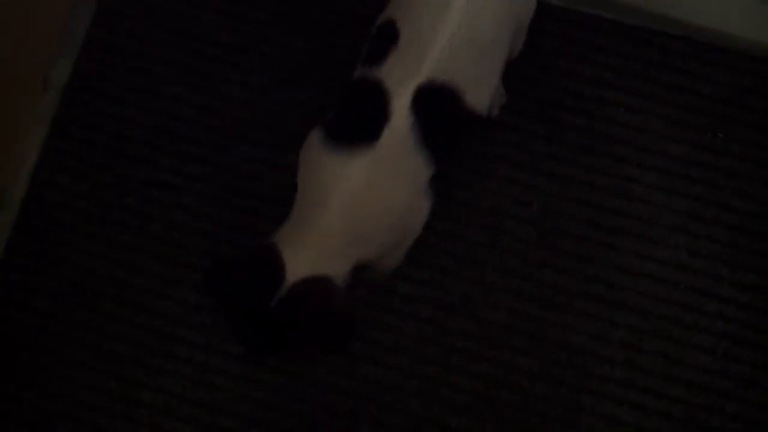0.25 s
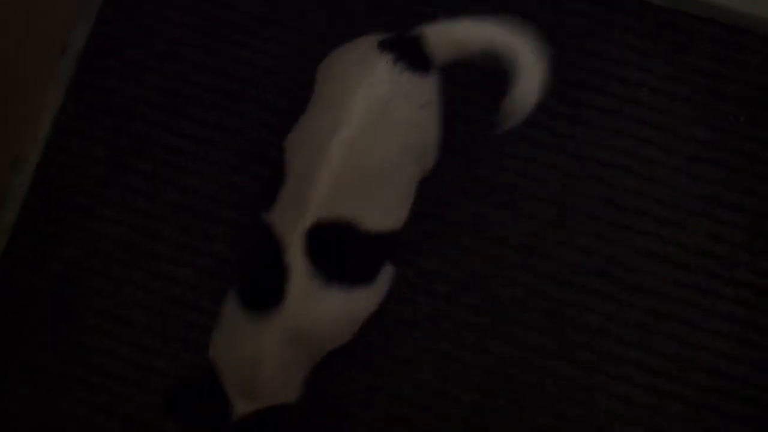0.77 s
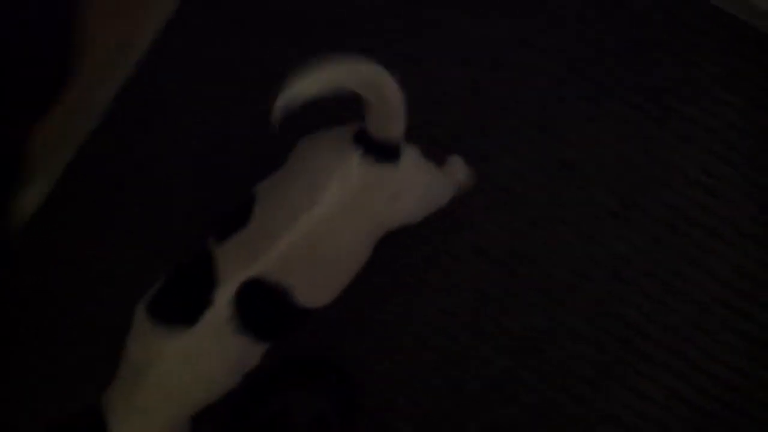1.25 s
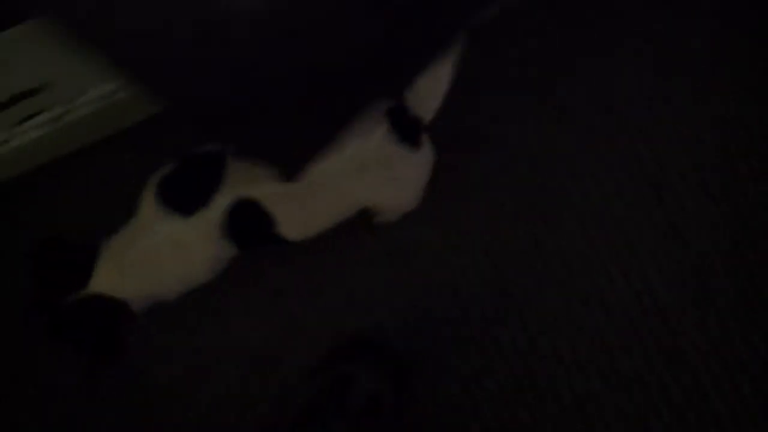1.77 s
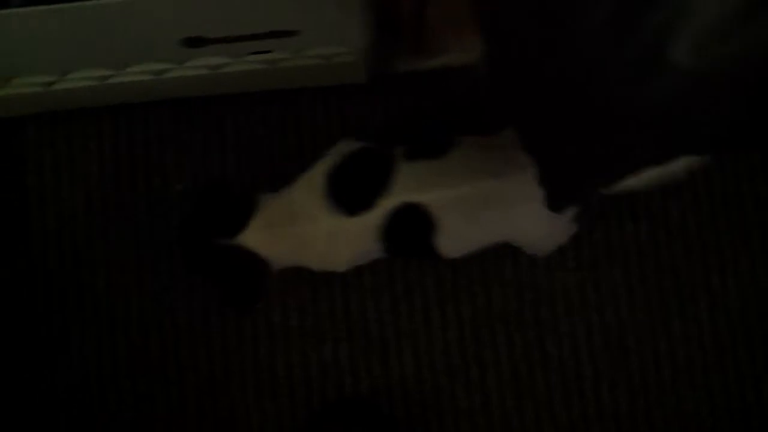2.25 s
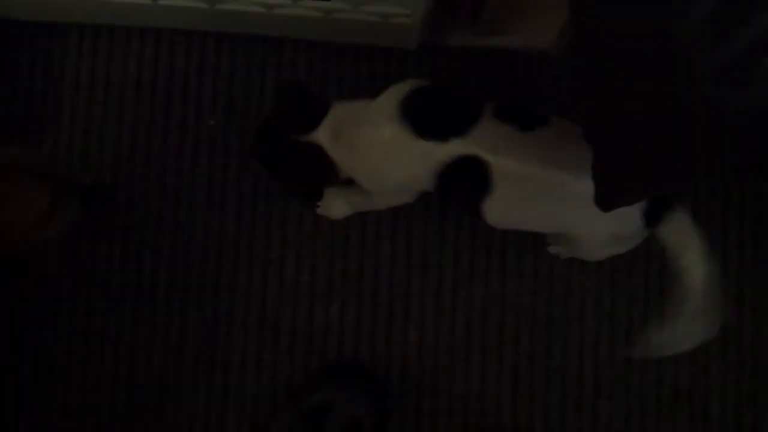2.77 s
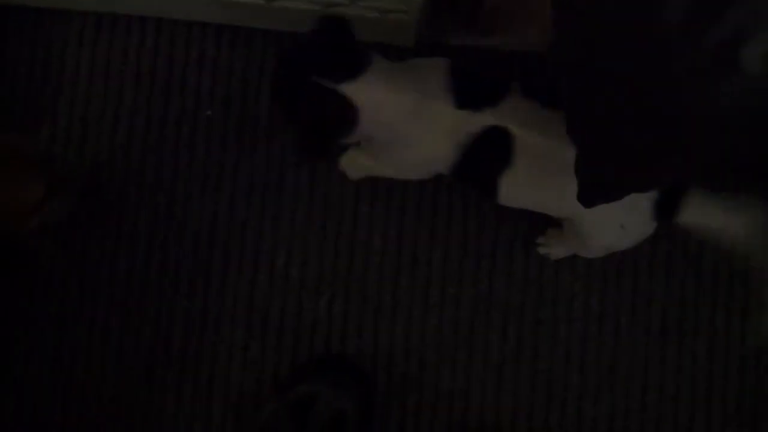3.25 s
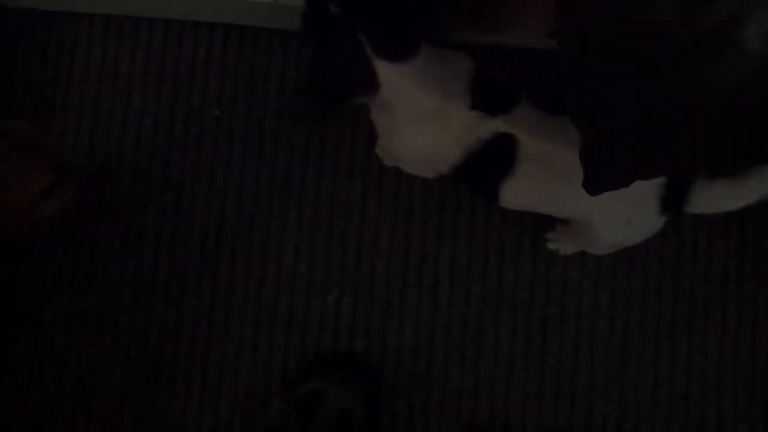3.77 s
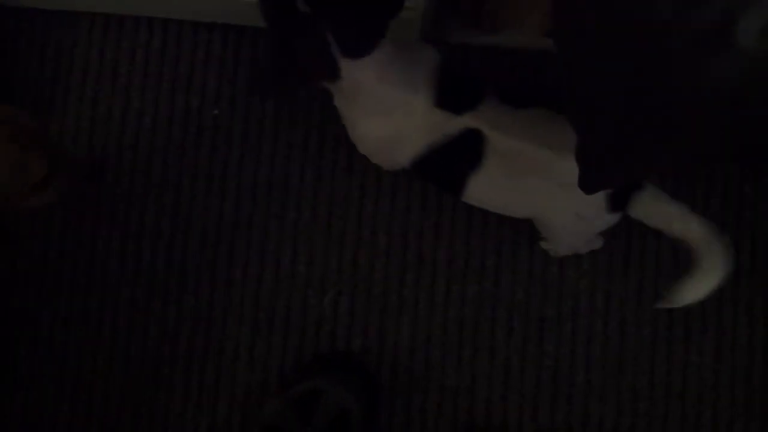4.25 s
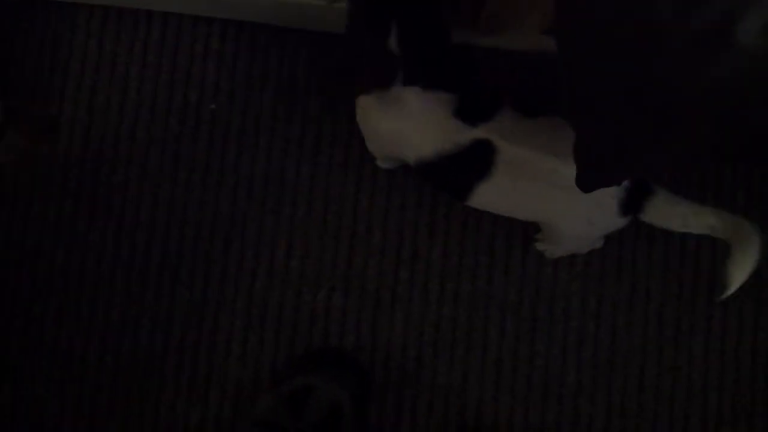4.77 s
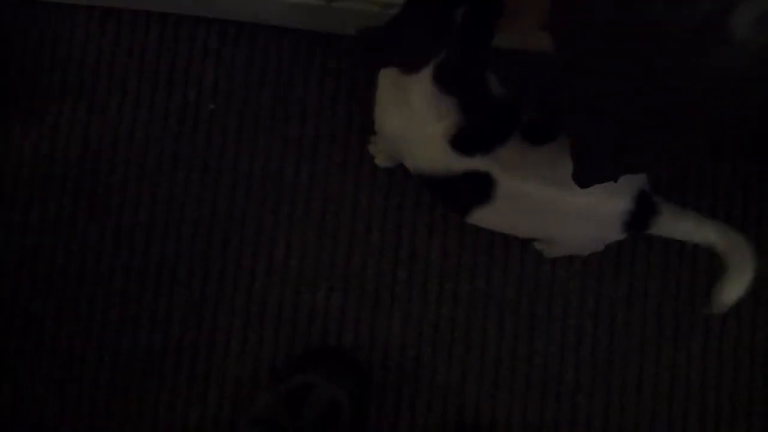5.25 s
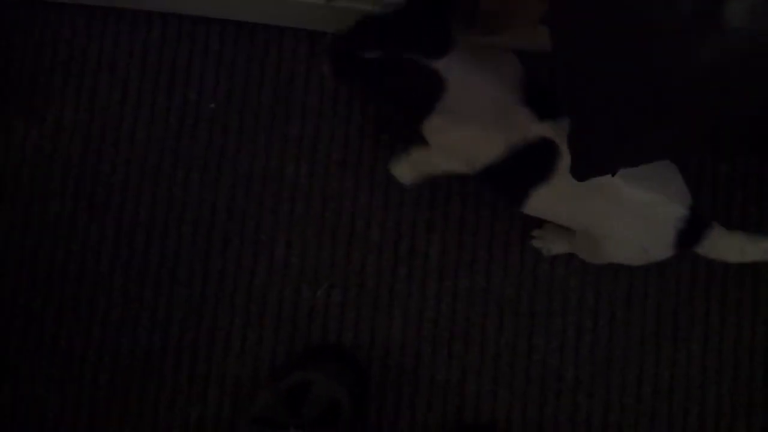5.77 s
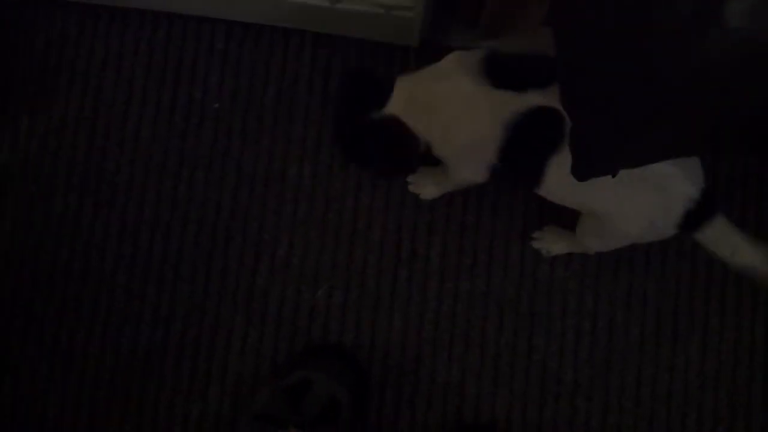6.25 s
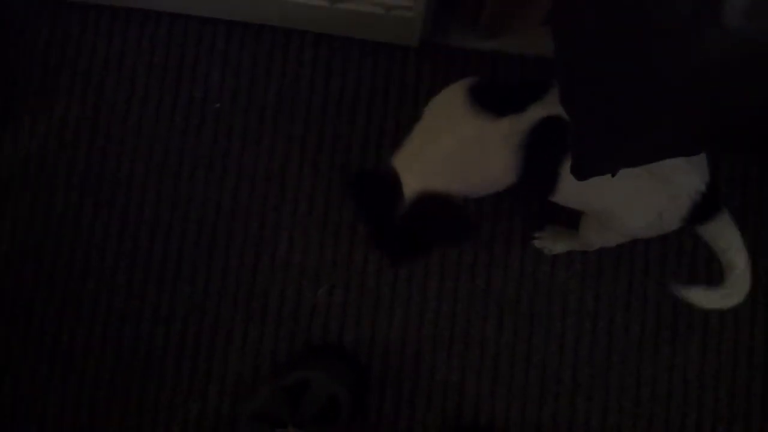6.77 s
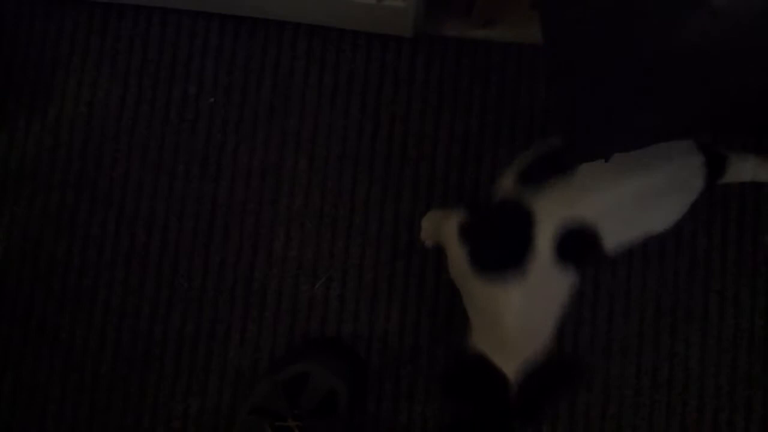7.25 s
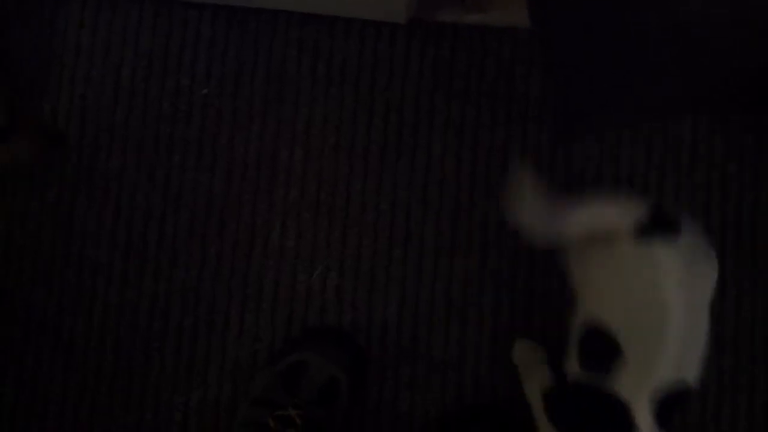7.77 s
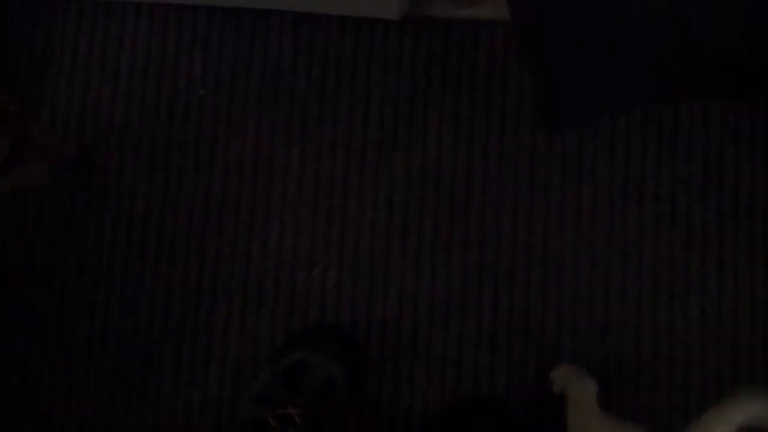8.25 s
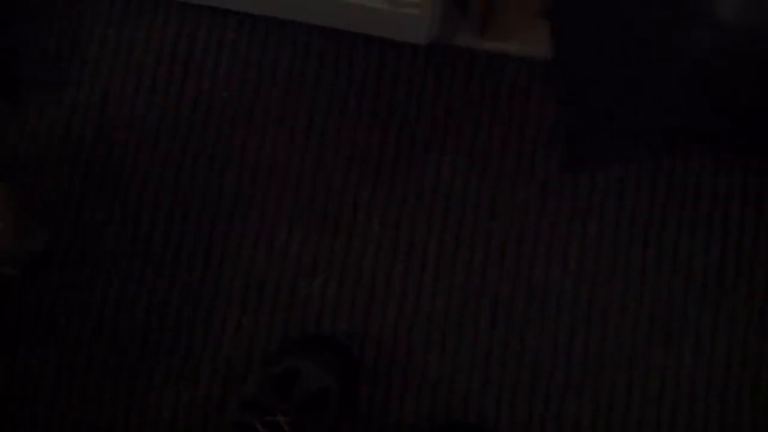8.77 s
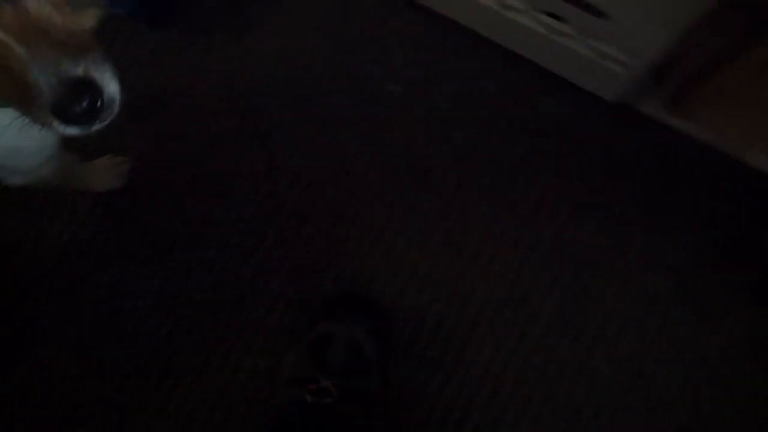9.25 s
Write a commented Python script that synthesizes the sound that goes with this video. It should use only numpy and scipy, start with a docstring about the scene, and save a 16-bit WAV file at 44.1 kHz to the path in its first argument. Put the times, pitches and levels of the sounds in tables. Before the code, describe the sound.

Close up in a dry carpeted room, a small dog crunches kibble over steady hiss. Light fur rustle and faint ticks lead to tight clusters of sharp cracks and bowl clinks around two to three seconds. A sparser, quieter stretch follows with a faint nose whistle, then crunching returns, peaking near seven and a half and eight seconds before fading into rustling.

```python
"""A steady hiss and a light stir of fur open the scene, then a small dog crunches dry kibble close by.
Cracks are bursts of micro-cracks in clusters, filtered into bowl knocks, pitched snaps and bright splinters.
Between them fur and cloth rustle as fluttering coloured noise, and paws thud as short low booms.
The nose whistles faintly once as narrow bands of noise; twice a damped swing marks a touch on the left port.
A short tail of decaying noise places the crunching in a carpeted room."""
import sys
import numpy as np
from scipy import signal
from scipy.fft import rfft, irfft
from scipy.io import wavfile
from scipy.ndimage import uniform_filter1d, minimum_filter1d

SR = 44100
rng = np.random.default_rng(int(sys.argv[2]) if len(sys.argv) > 2 else 0)


def wrap_up_sound(samples):
    """Save the sound to the file named by the first command line argument, as 16-bit audio."""
    columns = np.atleast_2d(samples).T
    # keep every value between -1 and 1, then stretch to whole-number steps
    tamed = np.clip(columns, -1, 1)
    steps = np.round(tamed * 32767).astype(np.int16)
    wavfile.write(sys.argv[1], SR, steps)


N = 419389

# steady hiss colour: (frequency [Hz], relative level per Hz [dB])
HISS_COLOUR = [(30, -13.5), (80, -17), (150, -8), (300, -2), (600, 1), (900, -1), (1400, -2.5),
               (2200, -5.5), (3800, -7), (5000, -3), (6800, -16), (8500, -8.5), (10500, -5), (14000, -11)]
# the two microphone ports: (frequency [Hz], likeness [-1..1], left over right [dB])
PORT_PAIR = [(60, -0.19, 4), (130, -0.15, 7.5), (285, -0.46, 6), (664, -0.43, 2), (1420, -0.041, 0.5),
             (2600, -0.093, 0.5), (4950, -0.062, -8), (8800, 0.15, 3), (13800, -0.29, 2.5)]
# room tail: (frequency [Hz], time to fall 60 dB [s])
ROOM_DECAY = [(100, 0.27), (530, 0.097), (1400, 0.11), (3700, 0.11), (10000, 0.065)]
# paws thud on the floor: (time [s], level before onset smoothing [dB])
PAW_THUDS = [(1.3, -40), (1.97, -34), (2.07, -58), (2.47, -45), (2.63, -49), (3.41, -63), (8.19, -45),
             (9.43, -48)]
# soft touches on the left port: (time [s], peak level [dB])
PORT_TOUCHES = [(8.2595, -7), (9.479, -24)]
# thin whistle of the nose: (time [s], lower resonance [Hz], upper resonance [Hz], level before trim [dB])
NOSE_WHISTLE = [(5.19, 1550, 3120, -70), (5.22, 1487, 3080, -52), (5.31, 1400, 2860, -45),
                (5.38, 1346, 2910, -45), (5.45, 1230, 2950, -59)]
# colour of the rubbing fur: (frequency [Hz], relative level per Hz [dB])
FUR_COLOUR = [(30, -30), (85, -17.5), (130, -20.5), (250, -3.5), (600, 4), (1400, 3), (2500, 1),
              (5200, -3.5), (7000, -39), (8500, -18.5), (11000, -18.5), (14000, -33)]
# light rubbing as the dog moves about or stands: (time [s], body before trim [dB], treble [dB])
FUR_STIR = [(0, -51.5, -52), (.95, -61.5, -60), (1.2, -44.5, -41.5), (2.2, -47, -41.5), (3.05, -46, -44),
            (3.25, -51.5, -48), (3.6, -46.5, -43.5), (3.85, -49.5, -53), (4.25, -57, -59), (5.4, -55, -53),
            (6.05, -61, -59), (6.6, -48, -72), (7.25, -59.5, -60), (7.5, -44.5, -43.5), (8, -50.5, -47.5),
            (8.4, -48.5, -43), (8.62, -56.5, -53.5), (9.5, -50, -35)]
# the dog brushes against bowl and carpet:
# (time at the height of the stroke [s], length [s], body before trim [dB], treble [dB])
BRUSH_STROKES = [(0.637, 0.2, -46, -48), (0.894, 0.16, -41.5, -56), (1.128, 0.17, -38.5, -42),
                 (1.301, 0.24, -29, -29.5), (1.51, 0.11, -58, -37), (1.646, 0.18, -43.5, -56),
                 (1.966, 0.32, -38.5, -35), (2.084, 0.13, -31.5, -27.5), (2.34, 0.113, -32, -35),
                 (2.542, 0.34, -41, -35.5), (2.706, 0.19, -35.5, -33), (2.939, 0.26, -41.5, -41),
                 (3.354, .09, -33, -29.5), (3.436, 0.098, -26.5, -31.5), (3.888, 0.079, -45.5, -60),
                 (4.121, .14, -46, -42), (4.51, 0.3, -49.5, -44.5), (5.257, 0.67, -56, -41.5),
                 (6.262, .14, -38.5, -44), (6.48, 0.13, -35.5, -42), (7.077, 0.17, -41.5, -41.5),
                 (7.154, 0.063, -28, -39), (7.371, 0.21, -35.5, -35), (7.693, 0.084, -34.5, -49),
                 (8.152, .2, -33, -29.5), (8.454, 0.13, -35.5, -37), (8.796, 0.17, -42.5, -38),
                 (9.17, 0.43, -45, -33), (9.408, 0.23, -38, -34.5)]
# ringing of the bowl, wall and rim first: (frequency [Hz], width [Hz], level over the plain knock [dB])
BOWL_MODES = [(848, 33, -34), (1864, 37, -26), (460, 54, 3), (2854, 160, -2), (4370, 82, -2),
              (4565, 180, 7.5), (5080, 95, 4), (5770, 30, -16)]
# contacts that set the two main modes ringing: (time [s], wall mode level [dB], rim mode level [dB])
BOWL_TAPS = [(1.952, -40, -16), (2.006, -32, -7.5), (2.072, -28, -14), (2.642, -8, -42), (2.672, -20, -15),
             (2.716, -16, -43), (2.737, -32, -40), (2.75, -14, -38), (2.877, -39, -17), (7.418, -38, -18),
             (7.448, -20, -13), (8.136, -22, -30), (8.148, -7, -28), (8.165, -4.5, -23), (8.188, -5, -21),
             (8.198, -25, -12)]
# individually placed cracks, ticks and mouth taps, faint to hard, before the trims in crunches():
# (time [s], crumbling time [s], knock level [dB], snap level [dB], pitch of the piece [Hz],
# treble splinter level [dB])
PLACED_CRACKS = [(.25, .003, -43, -50, 1200, -60), (.34, .003, -43, -50, 1200, -60),
                 (.48, .002, -56.5, -40.5, 4000, -55), (0.63, 0.0018, -62, -37, 2350, -42),
                 (.6664, 0.00093, -62, -36, 4300, -50), (0.8168, 0.0015, -34, -27.5, 2570, -24.5),
                 (0.8723, 0.008, -26.5, -28, 1720, -54), (0.8966, 0.0015, -49, -30, 1360, -53),
                 (0.933, .005, -44, -34, 4400, -59), (1.1191, 0.0037, -23, -27.5, 1430, -49),
                 (1.137, 0.0018, -42, -32.5, 1600, -53), (1.4892, 0.0036, -28, -35, 1760, -39),
                 (1.6045, 0.0022, -25, -29.5, 1430, -52), (1.6316, 0.0038, -38, -33, 1900, -47),
                 (1.6808, .004, -35, -34, 2210, -54), (1.8334, .004, -49, -35, 2017, -46.5),
                 (1.946, 0.0019, -47, -25, 4500, -33), (1.9496, 0.0034, -22.5, -16.5, 3100, -29.5),
                 (2.0003, 0.0033, -19, -16, 1750, -19.5), (2.0075, .002, -21, -23, 1650, -36),
                 (2.0663, .003, -44, -27, 2600, -36), (2.0733, 0.00096, -17.5, -14.5, 1550, -20.5),
                 (2.0884, 0.0073, -36, -17, 5500, -21), (2.3148, 0.0083, -46, -33, 3500, -31),
                 (2.325, 0.0025, -20, -19.5, 4600, -31), (2.339, .002, -45, -27, 2090, -37.5),
                 (2.5489, .002, -21, -24, 2774, -43), (2.6412, 0.0017, -19.5, -15, 3000, -20),
                 (2.6709, 0.0064, -30, -22.5, 2850, -22.5), (2.6784, 0.0059, -40, -21.5, 3550, -32),
                 (2.716, .003, -44, -27, 2650, -34), (2.7362, 0.0035, -26, -27.5, 2530, -35),
                 (2.774, 0.0036, -24.5, -19.5, 2440, -27.5), (2.8756, 0.0031, -45, -16.5, 2160, -27.5),
                 (3.0084, 0.012, -34.5, -39, 1288, -38.5), (3.1656, 0.0066, -44, -33, 3700, -47),
                 (3.3434, .002, -29, -31.5, 3920, -39), (3.4328, 0.0042, -23.5, -28, 1800, -31.5),
                 (3.4959, 0.0043, -32, -28, 2850, -37), (3.7825, 0.0056, -41, -35, 2720, -42.5),
                 (4.057, .001, -46, -40, 3120, -39), (4.4844, 0.0018, -42.5, -43, 3700, -37.5),
                 (4.5488, .005, -50.5, -42, 4300, -52), (5.04, 0.0031, -62, -41, 4100, -32),
                 (5.1028, 0.0075, -62, -31, 3020, -17.5), (5.3253, 0.0012, -52, -34, 2300, -51),
                 (6.177, 0.0025, -30, -39, 1400, -49), (6.254, .0014, -55, -31.5, 1755, -52),
                 (6.2747, 0.0059, -37, -33.5, 1730, -45), (6.4776, .003, -52, -31, 1480, -33.5),
                 (6.5207, 0.0047, -27.5, -29.5, 1750, -46), (6.5317, .002, -33, -39, 1400, -49),
                 (6.806, .003, -42, -37, 2150, -49), (6.8805, 0.0053, -25, -29.5, 1650, -58),
                 (7.0431, 0.0065, -25, -28, 1900, -34), (7.0835, 0.002, -52, -29.5, 1615, -50),
                 (7.0992, .002, -37, -24, 1990, -56), (7.1583, 0.0033, -26, -28, 2000, -31.5),
                 (7.329, 0.0026, -56, -23.5, 3990, -40), (7.3575, 0.0014, -43, -16, 2240, -37),
                 (7.367, 0.0012, -39, -19, 2140, -49), (7.3863, 0.0028, -22, -29.5, 1440, -25.5),
                 (7.418, .001, -21.5, -20, 1570, -36), (7.446, .0012, -11, -6, 2060, -11),
                 (7.631, .002, -63.5, -29.5, 4460, -30.5), (7.6513, 0.0063, -56, -27, 3210, -48),
                 (7.714, 0.0037, -25, -26, 2370, -41.5), (7.848, 0.0019, -20, -16, 2450, -24.5),
                 (8.0428, 0.0018, -57, -45, 2950, -31), (8.1334, 0.0016, -28, -19, 2950, -28),
                 (8.1458, 0.0011, -36, -14.5, 3000, -23), (8.1644, 0.0014, -27.5, -22, 3860, -31),
                 (8.1856, 0.0024, -15, -8, 3250, -13.5), (8.333, 0.00086, -60, -30.5, 2680, -52),
                 (8.4015, 0.0077, -41, -27, 3060, -29), (8.4189, .003, -33.5, -26.5, 2300, -45),
                 (8.443, .005, -39, -27.5, 2550, -37), (8.637, 0.0018, -55, -36, 4100, -47)]

HISS_DB = -43.5
CUTOFF_HZ = 14800
LIMIT_RELEASE_DB_PER_S = 600
# part of a stroke's length spent swelling; drop at both ends; 1 pointed, 2 rounded
STROKE_RISE_SHARE, STROKE_ENDS_DB, STROKE_SHAPE = 0.42, 18.5, 1.3
# crumbs: rate and level at the usual rubbing level, full range of random level
CRUMBS_PER_S, CRUMB_DB, CRUMB_SPREAD_DB, USUAL_RUB_DB = 20, -46, 12, -48
# shares of the rubbing's swing in dB that crumb level and rate follow; highest rate
CRUMB_FOLLOWS, CRUMB_RATE_FOLLOWS, MOST_CRUMBS_PER_S = 0.55, 0.8, 50
CRUMB_KNOCK_DB, CRUMB_SPLINTER_DB = -8, -8   # relative to the snap
PIECE_WIDTH_SHARE = 0.2   # width of a piece's ring over its pitch
CRUSH_SHARE, CRUSH_FOLLOWS = 1.21, 0.41   # broad crushing noise at 0 dB; how far it shrinks in small snaps
SPLINTER_PAN_DB = 24   # splinters reach the left port best


def from_db(db):
    """Decibels to gain."""
    return 10 ** (np.asarray(db) / 20)


def rms_one(x):
    """Scale to unit power."""
    return x / np.sqrt(np.mean(x ** 2) + 1e-20)


def in_time(rows):
    """Each column of a curve at every sample."""
    s, *columns = np.transpose(rows)
    return [np.interp(np.arange(N) / SR, s, column) for column in columns]


def at_hz(rows, hz):
    """Each column of a spectrum at one frequency, along a log axis."""
    table_hz, *columns = np.transpose(rows)
    return [np.interp(np.log(hz), np.log(table_hz), column) for column in columns]


def band(x, low_hz, high_hz, order=2):
    """Causal band-pass."""
    sos = signal.butter(order, [low_hz, high_hz], "band", fs=SR, output="sos")
    return signal.sosfilt(sos, x + 1e-18)


def resonate(x, hz, width_hz):
    """One two-pole resonance with gain 1 on top."""
    r = np.exp(-np.pi * width_hz / SR)
    feed = np.array([1, 0, -1]) * (1 - r * r) / 2
    return signal.lfilter(feed, [1, -2 * r * np.cos(2 * np.pi * hz / SR), r * r], x + 1e-18)


def drift(per_s):
    """Chance movement with unit rms: random knots joined by straight lines."""
    knots = np.arange(N) / SR * per_s
    return rms_one(np.interp(knots, np.arange(4000), rng.standard_normal(4000)))


def pan(db):
    """Left and right gains at constant power."""
    return rms_one(from_db([[db / 2], [-db / 2]]))


def port_bands(size):
    """Bands of stereo noise as the two ports hear it: (centre Hz, noise)."""
    edges = np.geomspace(25, 16500, 25)
    white = rng.standard_normal((2, 2, size))   # neighbouring bands use different noise
    for k, (low, high) in enumerate(zip(edges, edges[1:])):
        mid, side = band(white[k % 2], low, high)
        hz = np.sqrt(low * high)
        alike, pan_db = at_hz(PORT_PAIR, hz)
        shared = np.sqrt(1 + alike) * mid
        opposed = np.sqrt(1 - alike) * side * [[1], [-1]]
        yield hz, (shared + opposed) * pan(pan_db)


def coloured(spectrum):
    """Stereo noise of a given colour, rms 1."""
    return rms_one(sum(from_db(at_hz(spectrum, hz)[0]) * noise for hz, noise in port_bands(N)))


def far_port(x, lag_s, gain):
    """Left hears the sound first, right a moment later."""
    right = np.interp(np.arange(N) - lag_s * SR, np.arange(N), x, left=0)
    return np.array([x, gain * right])


def hiss():
    """Steady coloured noise under everything."""
    return from_db(HISS_DB) * coloured(HISS_COLOUR)


def room(x, wet_db, build_s, count=6):
    """Dense reflections; the treble dies first, and the pattern shifts steadily, cycling through six tails."""
    t, out = np.arange(SR // 3) / SR, 0
    place = np.arange(N) / SR * 16 % count   # moves on by 16 tails a second
    for k in range(count):
        tail = sum(noise * from_db(-60 * t / at_hz(ROOM_DECAY, hz)[0]) for hz, noise in port_bands(len(t)))
        tail = tail * (1 - np.exp(-t / build_s))
        tail = tail / np.sqrt(np.sum(tail ** 2) / 2)
        distance = np.abs((place - k + count / 2) % count - count / 2)
        share = np.sin(np.pi / 2 * np.maximum(1 - distance, 0))   # constant-power crossfade
        out = out + from_db(wet_db) * signal.oaconvolve(x * share, tail, axes=1)[:, :N]
    return out


def paws(floor_hz, t60):
    """Soft steps make the floor boom briefly, in opposite phase at the ports."""
    s, level_db = np.transpose(PAW_THUDS)[:, :, None]
    since = np.maximum(np.arange(N) / SR - s, 0)
    decay = from_db(level_db - np.minimum(60 * since / t60, 200))
    booms = decay * np.sin(2 * np.pi * floor_hz * since) * (1 - np.exp(-since / 0.0061))
    return np.sum(booms, axis=0) * [[1], [-.3]]


def bump(hz, width_hz):
    """A soft touch on the left port: one heavily damped swing."""
    push = np.zeros(N)
    for s, db in PORT_TOUCHES:
        push[round(s * SR)] = from_db(db)
    swing = band(resonate(push, hz, width_hz), 146, 1390)
    return push.max() * swing / np.abs(swing).max() * [[1], [-.25]]


def nose_air(hz, width_hz):
    """Breath noise shifted up to a moving resonance."""
    breath = band(rng.standard_normal((2, N)), 12, width_hz)
    return rms_one(breath * np.sin(2 * np.pi * np.cumsum(hz) / SR))


def nose(width_hz):
    """Two narrow resonances of air that sink overall, the upper one turning up near the end."""
    lower_hz, upper_hz, level_db = in_time(NOSE_WHISTLE)
    t = np.arange(N) / SR
    sounding = (t > NOSE_WHISTLE[0][0]) & (t < NOSE_WHISTLE[-1][0])
    air = nose_air(lower_hz, width_hz) + 0.69 * nose_air(upper_hz, width_hz)
    return from_db(level_db + 0.5) * sounding * air


def rubbing_db(t):
    """Body and treble level of the rubbing at times t: strokes swell and fade over the light stir."""
    s, *stir = np.transpose(FUR_STIR)
    power = np.array([from_db(np.interp(t, s, db)) ** 2 for db in stir])
    for peak_s, length_s, *levels_db in BRUSH_STROKES:
        before = (peak_s - t) / STROKE_RISE_SHARE
        after = (t - peak_s) / (1 - STROKE_RISE_SHARE)
        away = np.maximum(before, after) / length_s   # 0 at the height, 1 at either end
        drop_db = STROKE_ENDS_DB * np.minimum(away, 10) ** STROKE_SHAPE
        power += from_db(np.array(levels_db)[:, None] - drop_db) ** 2
    return 10 * np.log10(power)


def rustle(flutter_db, grain_db, treble_pan_db):
    """Hairs and fibres slip past each other: fine grains in a fluttering swish."""
    t = np.linspace(0, N / SR, 4000)
    body_db, treble_db = in_time(np.transpose([t, *rubbing_db(t)]))
    rub = coloured(FUR_COLOUR) * from_db(flutter_db * drift(70) + grain_db * drift(270))
    body = rms_one(band(rub, 30, 4200, order=3))
    treble = rms_one(band(rub, 8000, .45 * SR, order=3))
    return from_db(body_db + 2.5) * body + from_db(treble_db) * treble * pan(treble_pan_db)


def bowl(x):
    """The bowl's resonances ring on after each contact."""
    return x + sum(from_db(db) * resonate(x, hz, width_hz) for hz, width_hz, db in BOWL_MODES)


def bowl_ring(detune):
    """Wall and rim ring on after a contact, each time at a slightly different pitch."""
    t, out = np.arange(SR // 5) / SR, np.zeros((2, N + SR))
    for s, *levels_db in BOWL_TAPS:
        start = round(s * SR)
        for mode, (hz, width_hz, _) in enumerate(BOWL_MODES[:2]):
            tap_hz = hz * (1 + detune * rng.standard_normal())
            ring = np.sin(2 * np.pi * tap_hz * t) * np.exp(-np.pi * width_hz * t)
            onset = 1 - np.exp(-t / 0.00024)
            out[mode, start:start + len(t)] += from_db(levels_db[mode]) * ring * onset
    return out[:, :N]


def crumbs():
    """Loose crumbs: faint random cracks, denser and harder as the dog rubs, in the columns of PLACED_CRACKS."""
    gap, loud, crumble, pitch, bright, keep = rng.random((6, 900))
    s = np.cumsum(-np.log(gap)) / MOST_CRUMBS_PER_S
    busy_db = rubbing_db(s)[0] - USUAL_RUB_DB
    # thin the densest stream down to the wanted rate
    falls = keep * MOST_CRUMBS_PER_S < CRUMBS_PER_S * from_db(CRUMB_RATE_FOLLOWS * busy_db)
    snap_db = CRUMB_DB + CRUMB_FOLLOWS * busy_db + CRUMB_SPREAD_DB * (loud - .5)
    splinter_db = snap_db + CRUMB_SPLINTER_DB + 10 * (bright - .5)
    crumble_s, piece_hz = .0006 + .003 * crumble, 1200 * 3.2 ** pitch
    rows = np.transpose([s, crumble_s, snap_db + CRUMB_KNOCK_DB, snap_db, piece_hz, splinter_db])
    return list(rows[falls & (s < N / SR)])


def fracture(crumble_s, grain_db, rise_s):
    """One piece gives way: a main break amid uneven micro-cracks that die out, with a fairly even spectrum."""
    t = np.arange(2600) / SR
    grains = rng.standard_normal(len(t)) * from_db(grain_db * rng.standard_normal(len(t)))
    grains = grains * (1 - np.exp(-t / rise_s)) * np.exp(-t / crumble_s)
    grains[round(.5 * crumble_s * SR)] += 0.22 * np.sqrt(np.sum(grains ** 2))   # the main break
    spectrum = rfft(grains)
    evened = irfft(spectrum / (np.abs(spectrum) + 1e-9) ** .45)
    return evened * np.exp(-t / (crumble_s * 4))


def at_level(burst, db):
    """Give a burst the energy of 10 ms at this level."""
    return from_db(db) * burst * np.sqrt(.01 * SR / (np.sum(burst ** 2) + 1e-20))


def crunches():
    """Each crack knocks on the bowl, snaps at the pitch of its piece and throws off bright splinters."""
    knocks, snaps, splinters = np.zeros(N + SR), np.zeros(N + SR), np.zeros((2, N + SR))
    for s, crumble_s, knock_db, snap_db, piece_hz, splinter_db in PLACED_CRACKS + crumbs():
        force, other = [fracture(crumble_s * 0.82, grain_db=6.5, rise_s=crumble_s * 0.26) for _ in range(2)]
        start = round(s * SR)
        span = slice(start, start + len(force))

        knock = band(force, 702, 1357) + 0.25 * band(force, 283, 445) + 0.073 * band(force, 94, 240, order=1)
        knocks[span] += at_level(knock, knock_db + 2.0)

        top_hz = np.clip(2.1 * piece_hz, 2500, 5900)   # low-pitched pieces are duller
        snap = band(force, 820, top_hz, order=3)
        crush = CRUSH_SHARE * from_db(CRUSH_FOLLOWS * snap_db) * snap
        ring = resonate(snap, piece_hz, piece_hz * PIECE_WIDTH_SHARE)
        snaps[span] += at_level(crush + ring, snap_db)

        bright = band(np.array([force, other]), 8980, 12600)
        splinters[:, span] += at_level(bright, splinter_db + 3.0) * pan(SPLINTER_PAN_DB)
    return knocks[:N], snaps[:N], splinters[:, :N]


def scene():
    """Crunching in the room, with rustle, small noises and hiss."""
    small = nose(width_hz=150) + bump(hz=350, width_hz=310) + paws(floor_hz=81.4, t60=0.28)
    rubbing = rustle(flutter_db=1.26, grain_db=1.6, treble_pan_db=7)
    wall, rim = bowl_ring(detune=0.0093)
    rings = far_port(wall, lag_s=.00003, gain=-.55) + far_port(rim, lag_s=.00055, gain=.7)
    knocks, snaps, splinters = crunches()
    # the ports hear the lows in opposite phase
    low = far_port(bowl(knocks), lag_s=.00002, gain=-0.76) * from_db(0.5)
    middle = far_port(bowl(snaps), lag_s=0.000551, gain=0.76) * from_db(-0.5)
    echo = room(.85 * low + middle + .9 * splinters + .3 * rings, wet_db=-6.5, build_s=.001)
    return hiss() + small + rubbing + echo + rings + low + middle + splinters


def record(dry):
    """A fast limiter in each channel holds down the loudest cracks; the top is cut."""
    over_db = 20 * np.log10(np.maximum(np.abs(dry), 1))
    recovered_db = LIMIT_RELEASE_DB_PER_S * np.arange(N) / SR
    held_db = np.maximum.accumulate(over_db + recovered_db, axis=1) - recovered_db
    gain = minimum_filter1d(from_db(-held_db), size=25)   # duck just ahead of each peak
    gain = uniform_filter1d(gain, size=25)
    top_cut = signal.ellip(10, .3, 60, CUTOFF_HZ, fs=SR, output="sos")
    return signal.sosfilt(top_cut, gain * dry)


dry = scene()
out = record(dry)
wrap_up_sound(out)
```